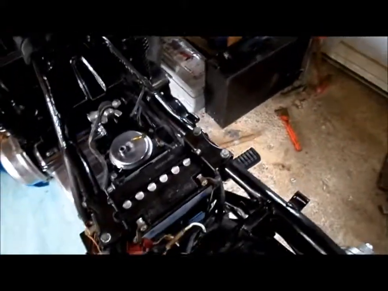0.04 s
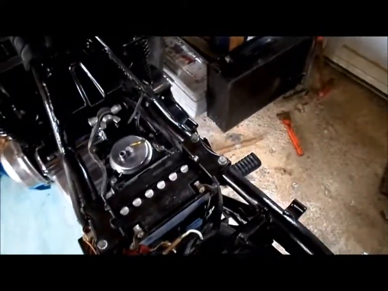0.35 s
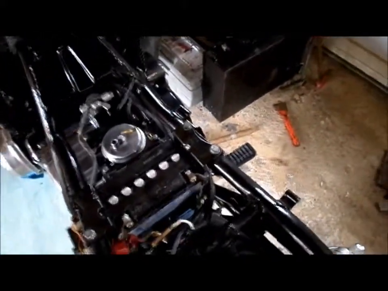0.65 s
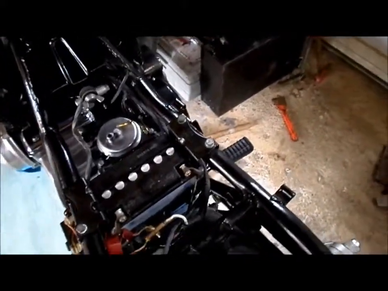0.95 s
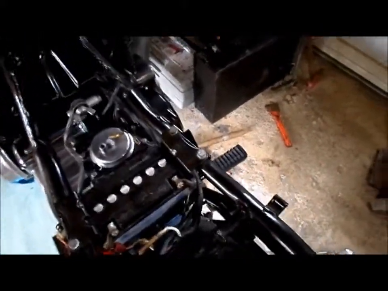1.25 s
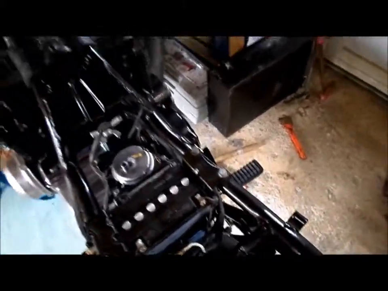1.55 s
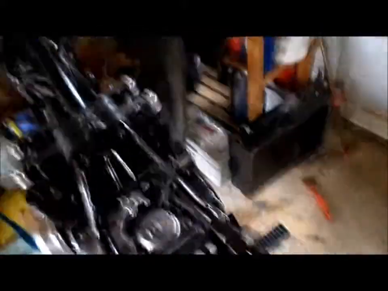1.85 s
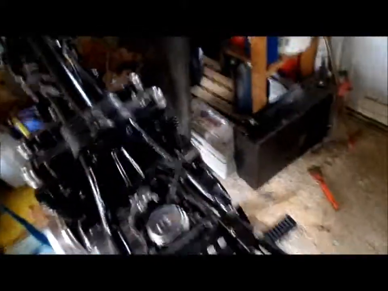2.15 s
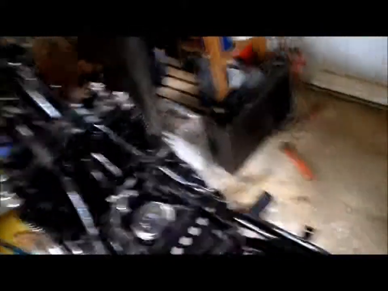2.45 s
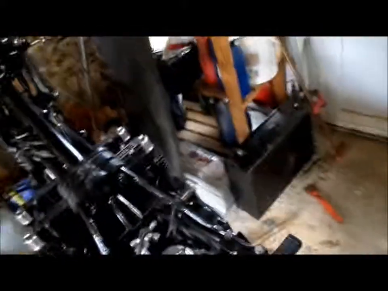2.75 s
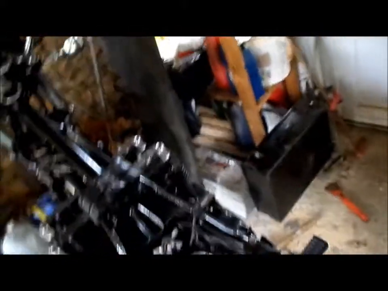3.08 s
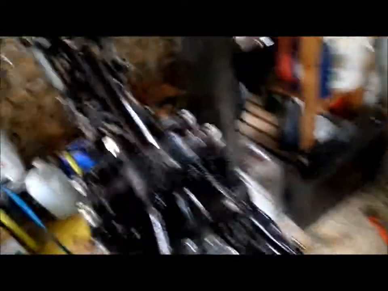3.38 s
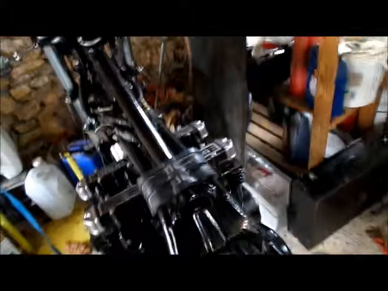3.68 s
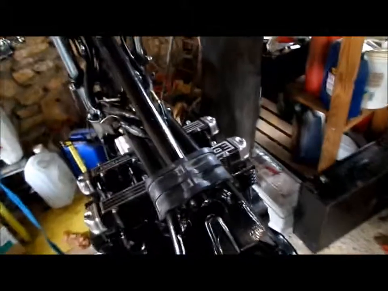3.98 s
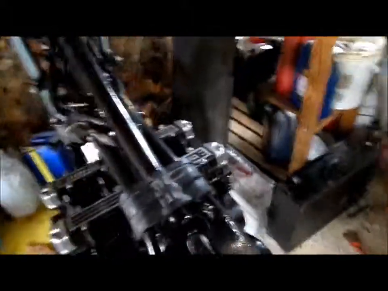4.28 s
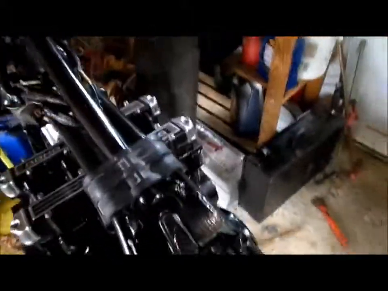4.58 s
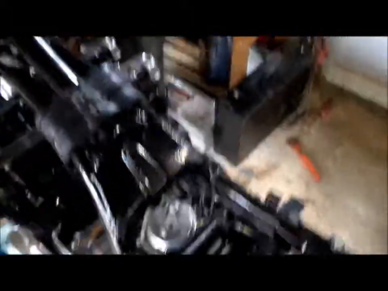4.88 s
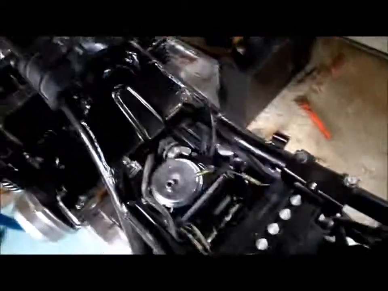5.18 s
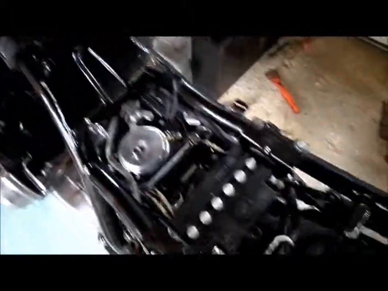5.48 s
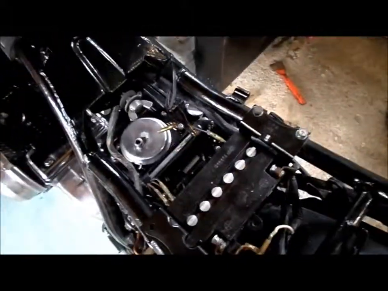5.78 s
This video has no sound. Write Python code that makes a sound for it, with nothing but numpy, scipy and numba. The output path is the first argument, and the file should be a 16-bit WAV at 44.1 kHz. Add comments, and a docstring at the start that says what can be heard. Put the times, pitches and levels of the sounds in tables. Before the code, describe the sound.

Someone moves about a small, quiet workshop with soft thuds on the floor and a few light metal ticks. Fingers then rub, bump and click right on the handheld microphone, ending in two very loud, dry plastic clacks. A run of hollow knocks and small metal snaps follows, with a short room echo over faint hiss.

```python
"""Small workshop: someone moves about a stripped motorcycle, camera in hand.
Dull thuds, hollow knocks, metal snaps and ticks are blows that ring parts and echo in the room.
Fingers rub, bump and click on the camera shell; two plastic clacks overload the microphone.
The hand cups the microphone, so the treble has a resonance that moves with the grip."""
import sys
import numpy as np
from scipy import signal
from scipy.fft import rfft, irfft, next_fast_len
from scipy.io import wavfile
from scipy.ndimage import uniform_filter1d
from numba import njit

SR = 44100
rng = np.random.default_rng(int(sys.argv[2]) if len(sys.argv) > 2 else 0)


def dump_mix(stems):
    """Bounce the given channels to the path in sys.argv[1] as a 16-bit WAV at rate SR."""
    frames = np.atleast_2d(stems).T  # one column per channel
    limited = np.clip(frames, -1, 1)  # hard clip at full scale
    pcm = np.round(limited * 32767).astype(np.int16)
    wavfile.write(sys.argv[1], SR, pcm)


N = 261513
TIME = np.arange(N) / SR
AGE = np.arange(SR // 2) / SR  # time since a blow/s

# spectrum of a metal snap: f/Hz, level/dB
SNAP_SPECTRUM = [(410, -27), (700, -7), (1620, 0.5), (2300, -1), (4550, 2), (5330, 7), (8310, -4),
                 (11400, -16.5), (13500, -10.5), (16000, -61)]


def amp(db):
    """dB to gain."""
    return 10 ** (np.asarray(db) / 20)


def fade(t60_s):
    """Decay of 60 dB in t60_s, 0.1 ms at least."""
    return np.exp(-np.log(1000) * AGE / max(t60_s, 1e-4))


def unit(x):
    """Scale to unit energy."""
    return x / np.sqrt(np.sum(x ** 2))


def at_peak(x, db):
    """Scale the loudest 4 ms to this RMS level."""
    return x * amp(db) / np.sqrt(uniform_filter1d(x ** 2, 176, mode="constant").max())


def add(out, t_s, x):
    """Mix x in at t_s."""
    start = int(t_s * SR)
    out[start:start + len(x)] += x[:N - start]


def bin_octaves(size):
    """log2(f/Hz) of each FFT bin."""
    return np.log2(np.maximum(np.fft.rfftfreq(size, 1 / SR), 1))


def colour(x, points, tilt_db_oct=0):
    """Minimum-phase filter through tilted (f/Hz, level/dB) points."""
    size = 2 * next_fast_len(len(x))
    hz, db = np.transpose(points)
    tilted_db = db + tilt_db_oct * np.log2(hz / hz[0])
    gain = amp(np.interp(bin_octaves(size), np.log2(hz), tilted_db))
    cepstrum = irfft(np.log(gain))
    cepstrum[1:size // 2] *= 2
    cepstrum[size // 2 + 1:] = 0
    return irfft(rfft(x, size) * np.exp(rfft(cepstrum)))[:len(x)]


def cut(x, hz, kind, order=2):
    """Butterworth low- or high-pass."""
    return signal.sosfilt(signal.butter(order, min(hz, SR / 2 - 1), kind, fs=SR, output="sos"), x)


@njit
def svf(x, hz, width_hz):
    """State-variable band-pass, tuned per sample."""
    y, band_state, low_state = np.empty(len(x)), 0., 0.
    for i in range(len(x)):
        g, k = np.tan(np.pi * hz[i] / SR), width_hz[i] / hz[i]
        band = (band_state + g * (x[i] + 1e-18 - low_state)) / (1 + g * (g + k))
        band_state = 2 * band - band_state
        low_state += 2 * g * band
        y[i] = k * band
    return y


def resonate(x, hz, width_hz):
    """One resonance, steady or moving, gain 1 at its centre."""
    return svf(x, hz * np.ones(len(x)), width_hz * np.ones(len(x)))


def ring(force, modes, damping=1):
    """Force through (f/Hz, width/Hz, level/dB) modes of alternating sign."""
    return sum((-1) ** k * amp(db) * resonate(force, hz, width_hz * damping)
               for k, (hz, width_hz, db) in enumerate(modes))


def contact(t60_s, grit):
    """Force of a blow: one push, then surface chatter that builds and dies."""
    push = 1. * (AGE == 0)
    chatter = rng.standard_normal(len(AGE)) * fade(t60_s) * (1 - fade(5.1 * t60_s))
    return push + grit * unit(chatter)


def in_room(x, echo_db, build_s=0.00031):
    """Direct sound plus a dense workshop echo that dies band by band."""
    # room decay: f/Hz, t60/s
    decay_times = [(200, 0.49), (530, 0.32), (1390, 0.23), (3680, 0.25), (9700, 0.21)]
    hz, t60_s = np.transpose(decay_times)
    octaves = bin_octaves(len(AGE))
    noise = rfft(rng.standard_normal(len(AGE)))
    tail = np.zeros(len(AGE))
    for band, band_t60_s in zip(np.eye(len(hz)), t60_s):
        weight = np.interp(octaves, np.log2(hz), band)
        tail += irfft(noise * weight, len(AGE)) * fade(band_t60_s)
    tail *= 1 - np.exp(-AGE / build_s)
    echo = signal.fftconvolve(x, tail)[:len(x)]
    return unit(x) + amp(echo_db) * unit(echo)


def rub(length_s, db, hz, width_hz):
    """Skin catches and lets go: tiny uneven slips rise and fade through one resonance."""
    count = max(int(length_s * SR), 512)
    slips = rng.standard_normal(count) * amp(2.8 * rng.exponential(size=count))
    slips *= rng.random(count) < 0.13
    catches = uniform_filter1d(rng.standard_normal(count), size=220)
    force = slips * amp(0.93 * catches / catches.std()) * np.hanning(count) ** 0.19
    bright = resonate(force, hz, width_hz)
    # soft skin gives little treble far above the resonance
    soft = cut(resonate(bright, hz, 31 * width_hz), hz + 1.84 * width_hz, "low")
    return (unit(soft) + 0.063 * unit(bright)) * np.sqrt(count / 2) * amp(db)


def background():
    """Steady room air; a low hum that ends early."""
    # air spectrum: f/Hz, level/dB
    air_spectrum = [(15, -65), (25, 2), (293, -1.5), (354, -1), (427, -1.5), (575, -0.5), (840, -3),
                    (1260, -5), (1840, -6), (5730, -12.5), (16000, -23)]
    hum_hz, hum_width_hz, hum_end_s = 66, 8, 0.88
    air = unit(colour(rng.standard_normal(N), air_spectrum)) * amp(-50.5)
    hum = resonate(rng.standard_normal(N), hum_hz, hum_width_hz)
    hum = unit(resonate(hum, hum_hz, hum_width_hz)) * amp(-55.5)
    gate = np.clip((hum_end_s - TIME) / 0.15, 0, 1)
    return (air + hum * gate) * np.sqrt(N)


def grip_rumble():
    """The shifting hand rumbles faintly through the housing."""
    start_s, end_s, hz = 1.5, 3.5, 53.5
    low = cut(resonate(rng.standard_normal(N), hz, width_hz=hz), 2 * hz, "low")
    gate = np.clip(np.minimum(TIME - start_s, end_s - TIME) / 0.13, 0, 1)
    return unit(low) * np.sqrt(N) * amp(-62) * gate


def palm_drag():
    """The palm drags over the housing; its low rustle follows the pressure."""
    # palm pressure: t/s, level/dB
    pressure = [(1.88, -31.5), (1.95, -27), (1.972, -38), (2.018, -32.5), (2.04, -44.5), (2.072, -29),
                (2.171, -30), (2.22, -76)]
    t_s, db = np.transpose(pressure)
    out = np.zeros(N)
    add(out, t_s[0], rub(t_s[-1] - t_s[0], db=0, hz=650, width_hz=540))
    return out * amp(np.interp(TIME, t_s, db))


def hand_bumps():
    """The hand pushes on the housing: a swing or two of low pressure."""
    # pushes: t/s, level/dB, f/Hz
    pushes = [(1.636, -22, 168), (1.643, -21, 66), (1.704, -32, 250), (1.802, -27, 194),
              (2.076, -32.5, 122), (3.069, -41.5, 106), (3.584, -34, 117), (4.504, -29.5, 188)]
    out = np.zeros(N)
    for t_s, db, hz in pushes:
        swing = np.sin(2 * np.pi * hz * AGE) * fade(4.1 / hz) * (1 - fade(0.0022))
        add(out, t_s, at_peak(cut(swing, hz / 2, "high"), db))
    return out


def finger_strokes(cup_hz):
    """Fingers rub the shell: the hollow of the hand and the case ring, the skin crackles."""
    # strokes: start/s, end/s, level/dB, crackle/dB re stroke
    strokes = [(1.584, 1.623, -24, -2.5), (1.612, 1.654, -29, -10), (1.692, 1.767, -43.5, -15),
               (1.742, 1.812, -27.5, -14), (1.795, 1.831, -25, -34), (1.836, 1.882, -30, -29),
               (1.956, 2.027, -31.5, -20.5), (2.08, 2.185, -30.5, -38), (2.541, 2.591, -40, -24),
               (2.608, 2.642, -37.5, -20), (2.744, 2.781, -35.5, -20), (2.863, 3.063, -44, -10.5),
               (3.011, 3.099, -36, -14), (3.576, 3.682, -48, -26), (3.916, 3.964, -43, -42)]
    out = np.zeros(N)
    for start_s, end_s, db, crackle_db in strokes:
        length_s = end_s - start_s
        hollow_hz = np.interp((start_s + end_s) / 2, TIME, cup_hz)
        hollow = rub(length_s, db, hollow_hz, width_hz=1210)
        case = rub(length_s, db - 10.5, hz=3200, width_hz=810)
        crackle = rub(length_s, db + crackle_db, hz=11900, width_hz=6000)
        add(out, start_s, hollow + case + crackle)
    return out


def metal_ticks():
    """A tiny part is touched and rings very high."""
    # touches: t/s, level/dB, contact/s (negative acts as 0.1 ms)
    touches = [(.080, -33, 0.5), (.815, -31, 0.2), (3.847, -45, -0.3)]
    # modes of the part: f/Hz, width/Hz, level/dB
    part_modes = [(8100, 1200, -5), (13540, 540, 8)]
    out = np.zeros(N)
    for t_s, db, contact_s in touches:
        body = cut(ring(contact(contact_s, grit=1), part_modes), 5000, "high")
        add(out, t_s, at_peak(in_room(body, echo_db=-13), db))
    return out


def floor_thuds():
    """Soft blows on the floor: longer contact is duller and booms more at one low note."""
    # blows: t/s, level/dB, contact/s, boom/Hz
    blows = [(.301, -38, 0.0078, 296), (.344, -31, 0.035, 317), (0.417, -32.5, 0.0033, 323),
             (0.436, -33.5, 0.068, 288), (.483, -37, 0.01, 600), (.576, -19, 0.0062, 228),
             (.66, -28, 0.04, 336), (.704, -23.5, 0.0069, 383), (0.8, -39, 0.095, 327),
             (3.601, -27.5, 0.019, 271), (5.287, -40.5, 0.015, 334)]
    # thud spectrum: f/Hz, level/dB
    thud_spectrum = [(53, -63), (90, -16), (207, -3.5), (560, 3.5), (1250, -5), (2200, -3), (3250, -84)]
    out = np.zeros(N)
    for t_s, db, contact_s, boom_hz in blows:
        softness = contact_s / 0.02
        cutoff_hz = 1180 * (0.0016 / contact_s) ** 0.2
        force = contact(contact_s, grit=softness)
        body = cut(colour(force, thud_spectrum), cutoff_hz, "low", order=3)
        boom = np.sin(2 * np.pi * boom_hz * AGE) * fade(22 / boom_hz) * (1 - fade(2 * contact_s))
        thud = in_room(body, echo_db=-1) + 0.98 * np.sqrt(softness) * unit(boom)
        add(out, t_s, at_peak(thud, db))
    return out


def metal_snaps():
    """Small steel parts snap together: a burst of chatter and a high ring."""
    # snaps: t/s, level/dB, contact/s, tilt/(dB/oct), ring/dB, ring/Hz
    snaps = [(.192, -33, 0.022, -7, -4.5, 7450), (0.815, -28, 0.014, -2, -1, 8300),
             (3.272, -30.5, 0.014, 0, -22, 13300), (4.5, -28, 0.017, -0.5, -19, 13400),
             (5.146, -35, 0.0067, -2.5, -6, 4930), (5.731, -29.5, 0.017, -.5, -17, 13400)]
    out = np.zeros(N)
    for t_s, db, contact_s, tilt_db_oct, ring_db, ring_hz in snaps:
        force = contact(contact_s, grit=2.5)
        chatter = unit(colour(force, SNAP_SPECTRUM, tilt_db_oct))
        steel = amp(ring_db) * unit(resonate(force, ring_hz, width_hz=960))
        echo_db = 4.5 + 6 * np.log2(contact_s / 0.023)  # longer chatter wakes more of the room
        add(out, t_s, at_peak(in_room(chatter + steel, echo_db), db))
    return out


def hollow_knocks():
    """A blow rings the spot it hits and the hollow part behind; a bright crack rides on top."""
    # blows: t/s, level/dB, spot resonance/Hz, crack/dB re knock
    blows = [(3.6, -25, 750, -9.5), (3.709, -38, 687, -22), (3.874, -39.5, 590, -8),
             (4.055, -22.5, 570, -10.5), (4.056, -25.5, 1510, -15), (4.521, -16, 1055, -18),
             (4.568, -37, 1140, -2.5), (4.6705, -12, 590, -10), (4.714, -16, 548, -16),
             (4.827, -31, 590, -13), (5.092, -36, 855, -30)]
    # rattle spectrum: f/Hz, level/dB
    rattle_spectrum = [(53, -80), (90, -25.5), (429, -11.5), (592, -3), (723, -25), (842, -2),
                       (3500, -48.5), (4550, -62), (7700, -120)]
    # modes of the hollow part: f/Hz, width/Hz, level/dB
    hollow_modes = [(349, 13, 8), (549, 16, -1), (603, 49, 12), (853, 20, -0.5), (1110, 160, 7.5)]
    out = np.zeros(N)
    for t_s, db, spot_hz, crack_db in blows:
        contact_s = 0.025 * (608 / spot_hz) ** 1.2
        spot = np.sin(2 * np.pi * spot_hz * AGE) * fade(1.02 * contact_s) * (1 - fade(contact_s))
        rattle = colour(contact(1.42 * contact_s, grit=5.3), rattle_spectrum)
        body = unit(spot) + 1.04 * unit(rattle)
        hollow = 0.68 * unit(ring(body, hollow_modes))
        crack = colour(contact(0.027, grit=1.6), SNAP_SPECTRUM, tilt_db_oct=-8)
        knock = in_room(unit(body) + hollow, echo_db=-3.5, build_s=0.0052)
        add(out, t_s, at_peak(knock, db))
        add(out, t_s, at_peak(in_room(crack, echo_db=6), db + crack_db))
    return out


def shell_clicks(cup_hz):
    """The camera shell clicks and rings briefly with the hollow of the hand."""
    # slips: t/s, level/dB, slip/s, tilt/(dB/oct)
    slips = [(1.636, -23, 0.014, 1), (1.644, -23, 0.0039, -4.5), (1.747, -27.5, 0.0047, 9),
             (1.7782, -10, 0.0042, -2.5), (1.8, -21, 0.015, -7), (1.8066, -14, 0.011, -8),
             (1.867, -30.5, 0.014, -1.5), (2.075, -23.5, 0.012, -11.5), (2.191, -29.5, 0.012, -10),
             (2.2271, -39, 0.0009, 4), (2.2433, -20, 0.0032, -3.5), (2.246, -27, 0.0025, 3),
             (2.2629, -20, 0.0016, -2.5), (2.275, -45, .001, 1), (2.2909, -16.5, 0.004, -1.5),
             (2.3042, -22, 0.01, -4), (2.3279, -13, 0.0046, -5.5), (2.452, -30.5, 0.001, -6.5),
             (2.5404, -30.5, 0.00031, -6), (2.6185, -40, 0.0012, -5), (2.726, -37, 0.014, 0.5)]
    # shell modes: f/Hz, width before damping/Hz, level/dB
    shell_modes = [(1350, 274, -2), (3176, 330, 8), (4050, 160, 0.5), (4760, 310, -1), (7360, 1150, -11.5),
                   (10120, 280, -13.5)]
    lead_s = 0.02
    out = np.zeros(N)
    for t_s, db, slip_s, tilt_db_oct in slips:
        noise = unit(rng.standard_normal(len(AGE)) * fade(4 * slip_s))
        lead_in = amp(-6) * noise[:int(lead_s * SR)][::-1]  # brief rising noise before the click
        force = np.concatenate([lead_in, contact(slip_s, grit=0.59)])
        cup_mode = (np.interp(t_s, TIME, cup_hz), 120, 7.5)
        ringing = unit(ring(force, [*shell_modes, cup_mode], damping=1.4))
        direct = 0.16 * unit(cut(force, 4700, "low", order=1))
        body = cut(ringing + direct, 205, "high")  # too small to radiate bass
        click = colour(body, [(400, 0), (9000, 0)], tilt_db_oct)
        add(out, t_s - lead_s, at_peak(in_room(click, echo_db=-18.5), db))
    return out


def plastic_clacks():
    """Hard plastic snaps twice beside the microphone, almost without echo."""
    # clacks: t/s, level/dB
    clacks = [(2.696, -2.5), (3.0707, -1.5)]
    # modes of each clack: f/Hz, width/Hz, level/dB
    first_modes = [(2873, 142, 8), (3560, 144, 6), (4550, 170, -1.5), (5160, 230, 5.5), (5780, 200, 4.5)]
    second_modes = [(2636, 157, 2), (3410, 240, 2.5), (5290, 190, -1.5), (5550, 210, -0.5), (6762, 186, 3)]
    out = np.zeros(N)
    for (t_s, db), modes in zip(clacks, (first_modes, second_modes)):
        crack = resonate(contact(0.013, grit=9.4), hz=2000, width_hz=2400)
        body = cut(ring(contact(0.002, grit=0.3), modes), 1770, "high")
        clack = unit(body) + amp(-21) * unit(crack)
        add(out, t_s, at_peak(in_room(clack, echo_db=-35), db))
    return out


def scene():
    """Room sounds pass the cupped hand; sounds on the camera reach the microphone directly."""
    # hollow of the hand: t/s, resonance/Hz, background gain/dB
    grip = [(0, 8300, 0), (1.62, 8730, -3), (1.72, 4330, 11.5), (1.775, 2964, 5), (2.15, 2670, 0.5),
            (2.33, 2455, -1.5), (2.54, 3350, -4), (2.62, 5540, 1), (2.77, 4800, -6), (2.92, 6740, 1),
            (3.3, 6160, 0), (4.3, 5600, -0.5), (5.93, 5770, -2)]
    t_s, *columns = np.transpose(grip)
    cup_hz, background_db = (np.interp(TIME, t_s, column) for column in columns)
    workshop = background() * amp(background_db)
    handling = palm_drag() + grip_rumble()
    workshop += floor_thuds() + hollow_knocks() + metal_snaps() + metal_ticks()
    handling += hand_bumps() + shell_clicks(cup_hz) + plastic_clacks() + finger_strokes(cup_hz)
    boost_db = 6.5
    cupped = workshop + (amp(boost_db) - 1) * resonate(workshop, cup_hz, width_hz=0.41 * cup_hz)
    return (cupped + handling)[None]


def record(dry):
    """Overload at full scale, then a steep 16 kHz low-pass."""
    low_pass = signal.ellip(8, 0.2, 70, 16000, fs=SR, output="sos")
    return signal.sosfilt(low_pass, np.clip(dry, -1, 1))


dry = scene()
out = record(dry)
dump_mix(out)
```